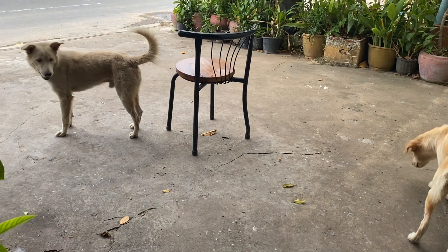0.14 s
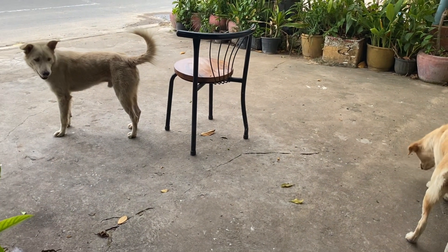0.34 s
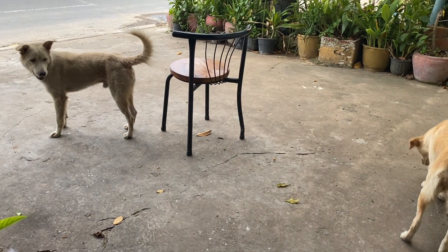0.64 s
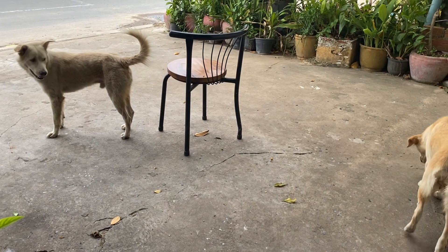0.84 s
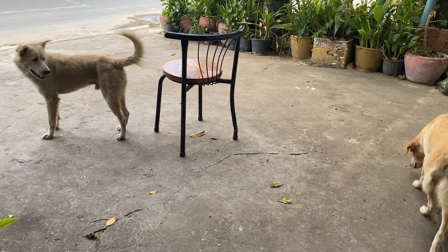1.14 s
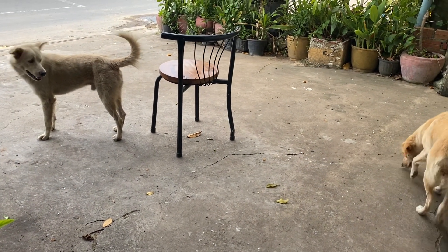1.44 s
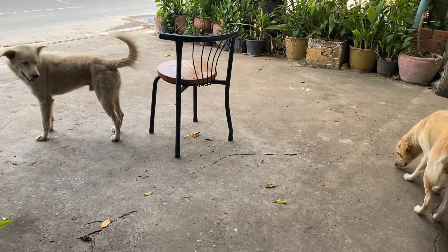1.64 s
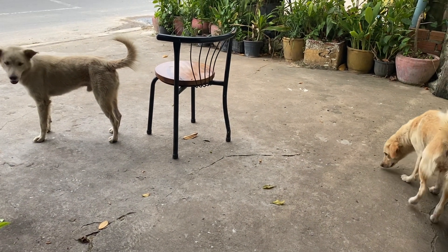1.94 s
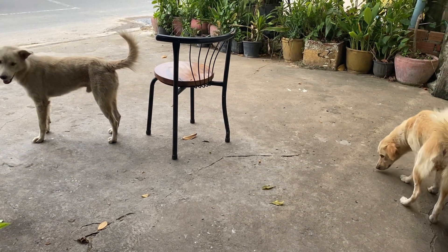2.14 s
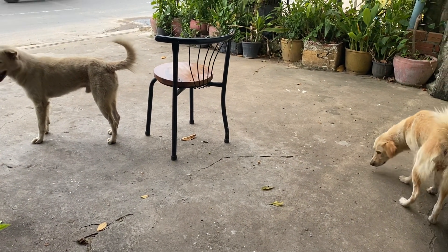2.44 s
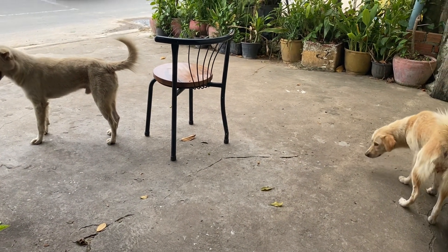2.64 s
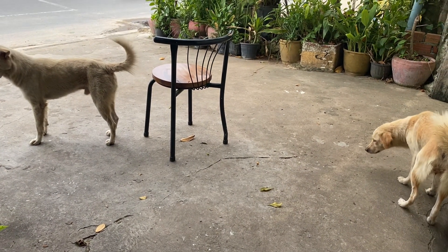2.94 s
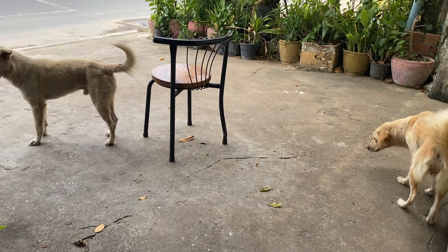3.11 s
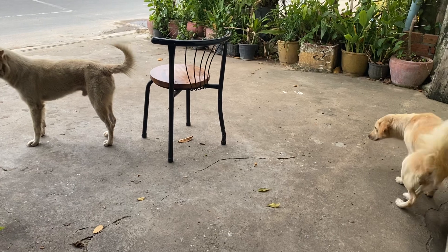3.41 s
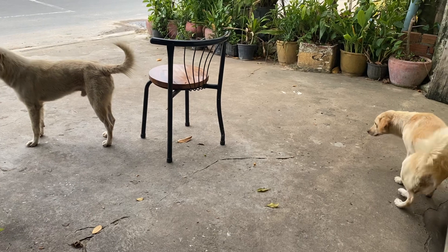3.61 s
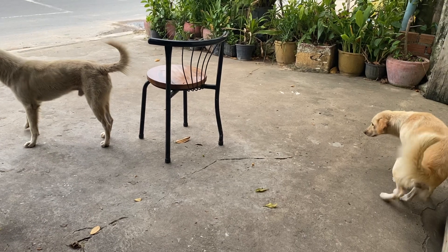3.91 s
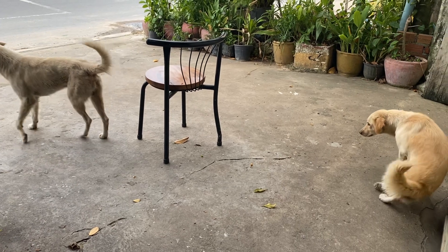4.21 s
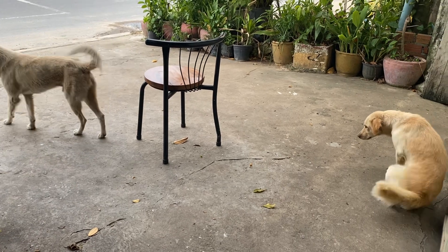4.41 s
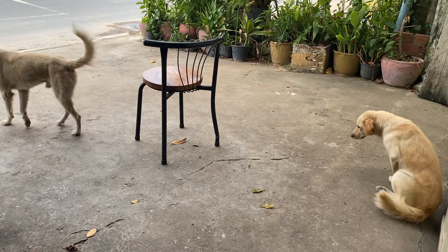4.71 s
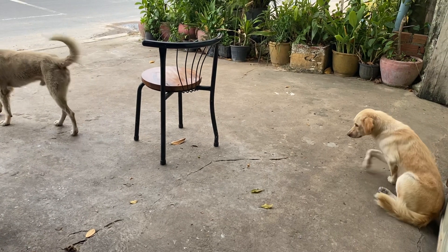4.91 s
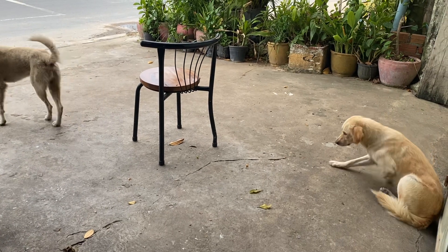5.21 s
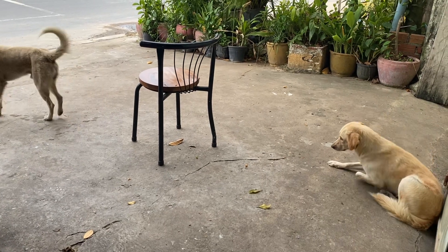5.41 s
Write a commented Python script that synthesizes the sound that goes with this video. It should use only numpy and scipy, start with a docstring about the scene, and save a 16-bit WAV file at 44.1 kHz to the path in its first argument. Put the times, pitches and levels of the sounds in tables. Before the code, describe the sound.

Low puttering motorbikes pass one after another on a road beside a concrete yard, with faint bird chips and a dog's claws scraping.

```python
"""On a road left of a concrete yard, a small motorbike throbs past over distant traffic in the first two seconds.
A dog's claw ticks and scrapes at 1.1 s, a bird chips from then on, and a second, quieter and slightly
higher-pitched bike drones by near 2.5 s. The claws scrape again at 4 s, and a third bike swells towards the end.
Trains of puffs through resonant pipes make the exhausts; coloured noise makes tyres, hiss, howls and claws.
Falling sine whistles make the bird; decaying noise tails scatter engines, bird and claws around the yard."""
import sys
import numpy as np
from scipy import signal
from scipy.fft import rfft, irfft, next_fast_len
from scipy.io import wavfile
from scipy.ndimage import uniform_filter1d, map_coordinates

SR = 44100
rng = np.random.default_rng(int(sys.argv[2]) if len(sys.argv) > 2 else 0)


def output_pcm(signal):
    """Save a mono or channel-first signal as 16-bit PCM at the path in sys.argv[1].

    Samples are clipped to [-1, 1] before scaling.
    """
    pcm = np.clip(np.atleast_2d(signal).T, -1, 1) * 32767
    wavfile.write(sys.argv[1], SR, np.round(pcm).astype(np.int16))


N = 244755


def amp(db):
    """Decibels to gain."""
    return 10 ** (np.asarray(db) / 20)


def unit(x):
    """Scale to rms 1."""
    return x / np.sqrt(np.mean(x ** 2) + 1e-20)


def along(points, hz):
    """Read (Hz, value) points along a log frequency axis."""
    point_hz, values = np.transpose(points)
    return np.interp(np.log(hz + 1), np.log(point_hz + 1), values)


def gain(points, hz):
    """Gain of a (Hz, dB) spectrum."""
    return amp(along(points, hz))


def curves(rows):
    """One value per sample for each column after the time."""
    s, *columns = np.transpose(rows)
    return [np.interp(np.arange(N) / SR, s, column) for column in columns]


def wobble(rate):
    """A smooth random curve with rate knots a second."""
    knots = rng.standard_normal(int(N * rate / SR) + 4)
    return map_coordinates(knots, [np.arange(N) * rate / SR])


def filtered(x, response):
    """Shape x by a complex response of frequency, with padding against wrap-around."""
    m = 2 * next_fast_len((N + SR) // 2)
    return irfft(rfft(x, m) * response(np.fft.rfftfreq(m, 1 / SR)), m)[..., :N]


def causal(magnitude):
    """Minimum-phase response: a resonance with this magnitude rings only after it is excited."""
    cepstrum = irfft(np.log(magnitude + 1e-6))
    half = len(cepstrum) // 2
    folded = np.r_[cepstrum[0], 2 * cepstrum[1:half], np.zeros(half)]
    return np.exp(rfft(folded))


# how alike the two microphone ports hear noise: frequency_hz, correlation [1 = identical]
PORT_LIKENESS = [(100, 0.98), (250, .9), (500, 0.95), (1100, 0.4), (2000, 0.55), (5000, 0.65), (7000, 0.35),
                 (8400, 0.91), (12000, 1)]


def noise(colour):
    """Stereo noise of rms 1, partly shared by the ports; colour gives gain at each frequency."""
    def split(hz):
        angle = np.arccos(np.clip(along(PORT_LIKENESS, hz), 0, 1)) / 2
        return colour(hz) * np.array([np.cos(angle), np.sin(angle)])

    shared, apart = filtered(rng.standard_normal((2, N)), split)
    return unit(np.array([shared + apart, shared - apart]))


def rush(spectrum):
    """Stereo noise of rms 1 with a relative (Hz, dB) spectrum."""
    return noise(lambda hz: gain(spectrum, hz))


def patchy(x, depth_db):
    """Changing paths from a moving source make narrow bands swell and fade, drawn here at random."""
    z = signal.stft(x, nperseg=2048)[2]
    field = rng.standard_normal(z.shape[1:])
    field = uniform_filter1d(field, size=3, axis=0)  # across frequency
    field = uniform_filter1d(field, size=12, axis=1)  # across time
    return unit(signal.istft(z * amp(depth_db * unit(field)), nperseg=2048)[1][:, :N])


# tone of the yard's scattered sound: frequency_hz, gain_db
YARD_TONE = [(200, -21.5), (1200, 30.5), (5000, 7.5), (10000, 16), (15000, -7)]


def yard(x, wet_db, t60):
    """The walls scatter a short tail, different at each port; wet_db is set on top of YARD_TONE."""
    t = np.arange(SR // 2) / SR
    tail = rng.standard_normal((2, len(t))) * amp(-60 * t / t60)
    tail = tail / np.linalg.norm(tail[0])
    scatter = signal.fftconvolve(np.atleast_2d(x), tail, axes=1)[:, :N]
    return x + amp(wet_db) * filtered(scatter, lambda hz: gain(YARD_TONE, hz))


def wall(x, delay, drift, echo_db):
    """A wall's echo comes later as the bike moves on, so single overtones swell and fade in turn."""
    t = np.arange(N) / SR
    echo = np.interp(t - delay - drift * t, t, x)
    return (x + amp(echo_db) * echo) / np.hypot(1, amp(echo_db))


def swell(s, half_s, fall_db, rear_db=0):
    """Level in dB around the nearest point at s: distance lowers it, rear_db tilts it to the rear."""
    past = (np.arange(N) / SR - s) / half_s
    return -fall_db * np.log10(1 + past ** 2) + rear_db * past / np.hypot(1, past)


HIDE_S = 0.042  # time constant of a bike crossing the edge of the view


def hidden(s):
    """Goes smoothly from 0 to 1 as a bike crosses the edge of the view at time s."""
    return .5 + .5 * np.tanh(.5 * (np.arange(N) / SR - s) / HIDE_S)


# throttle curves, the second closing near the end: time_s, firing_rate_hz
FIRST_THROTTLE = [(0, 27.5), (.4, 28.35), (.85, 29.55), (1.35, 29.8), (1.75, 30.25), (2.3, 30.5), (3, 30.7)]
SECOND_THROTTLE = [(0, 33), (.9, 32.2), (1.4, 33.8), (2.3, 34.3), (3.7, 33.4), (4, 32.7), (4.25, 30.5),
                   (5.55, 30)]
THIRD_THROTTLE = [(3.4, 27.4), (4.25, 28.15), (4.7, 28.7), (4.95, 29.3), (5.3, 29.3), (5.55, 29.7)]


def speeds():
    """Firings per second of the three bikes, each gliding between its throttle points."""
    return [curves(rows)[0] for rows in (FIRST_THROTTLE, SECOND_THROTTLE, THIRD_THROTTLE)]


# bikes going by, levels before the rear tilt and shading:
# nearest_s, half_width_s, out_of_sight_s, roar_db, hiss_db
BIKE_PASSES = [(1.55, 0.63, 1.87, -33.5, -40), (2.54, 0.98, 3.05, -37.5, -46.5), (5.85, 1, 7, -38, -49.5)]


def passing(peaks_db, far_db, fall_db, shade_db, rear_db):
    """Gain of one kind of road noise: every pass adds its power to the distant traffic."""
    power = amp(far_db) ** 2
    for (s, half_s, gone_s, *_), peak_db in zip(BIKE_PASSES, peaks_db):
        level_db = peak_db + swell(s, half_s, fall_db, rear_db) - shade_db * hidden(gone_s)
        power = power + amp(level_db) ** 2
    return np.sqrt(power)


# relative noise spectra of road rumble, tyres and running gear: frequency_hz, density_db (per Hz)
RUMBLE_TONE = [(20, -24), (42, -18), (58, -3), (80, -2.5), (135, -6.5), (195, -14.5), (260, -14.5),
               (370, -13), (460, -29.5), (900, -53), (3000, -86)]
TYRE_TONE = [(150, -24), (400, -1), (600, 2), (1020, 2), (1300, 1), (1550, 1), (1900, -4.5), (2200, -4.5),
             (3200, -7.5), (5000, -17), (9000, -45), (16000, -37.5)]
GEAR_TONE = [(1000, -29), (2500, -19), (4000, 4), (5200, 3), (6500, 6), (8500, 3.5), (10500, 3.5),
             (12000, -9), (13500, -48), (15500, -18)]
FAR_RUMBLE_DB, FAR_ROAR_DB, FAR_HISS_DB = -32, -67, -63  # distant traffic under the passes
PASS_RUMBLE_DB = -43


def road(flutter_db=.5, throb_db=0.8):
    """Rumble, tyre roar and running-gear hiss rise with each pass; the hiss throbs with the first engine."""
    *_, roar_db, hiss_db = np.transpose(BIKE_PASSES)
    stroke = np.cos(2 * np.pi * np.cumsum(speeds()[0]) / SR)
    tyres = patchy(rush(TYRE_TONE), depth_db=2.3)
    gear = patchy(rush(GEAR_TONE), depth_db=2.4)
    roar = passing(roar_db, FAR_ROAR_DB, fall_db=16.5, shade_db=0.5, rear_db=-1.0)
    roar = roar * amp(flutter_db * wobble(9))
    hiss = passing(hiss_db, FAR_HISS_DB, fall_db=21.5, shade_db=7.0, rear_db=1.5)
    hiss = hiss * amp(flutter_db * wobble(23.05) + throb_db * stroke)
    rumble_db = [PASS_RUMBLE_DB] * len(BIKE_PASSES)
    rumble = passing(rumble_db, FAR_RUMBLE_DB, fall_db=18, shade_db=2.5, rear_db=0)
    return roar * tyres + hiss * gear + rumble * rush(RUMBLE_TONE)


# bird chips, pitch and level of the first voice before rasp and breaks:
# start_s, start_pitch_hz, end_pitch_hz, glide_s, level_db
BIRD_CHIPS = [(1.172, 6000, 4500, .015, -43.5), (1.868, 6000, 4150, .017, -43),
              (2.615, 6000, 4300, .017, -45.5), (2.712, 6000, 4600, .017, -47),
              (3.706, 6000, 4080, .015, -44.5), (4.326, 6800, 4400, .017, -48),
              (4.348, 4900, 3350, .012, -50), (4.899, 6000, 3950, .018, -44)]
# the second voice is higher, later and weaker than the first
SECOND_VOICE_RATIO, SECOND_VOICE_LAG_S, SECOND_VOICE_DB = 1.18, .018, -8


def bird(peak=0.025):
    """Each chip is two raspy, broken whistles dropping quickly in pitch; each swells for peak seconds."""
    t, out = np.arange(SR // 5) / SR, np.zeros(N + SR)
    swell_shape = (t / peak * np.exp(1 - t / peak)) ** 2
    voices = [(1, 0, 0), (SECOND_VOICE_RATIO, SECOND_VOICE_LAG_S, SECOND_VOICE_DB)]
    for s, start_hz, end_hz, glide, level_db in BIRD_CHIPS:
        for ratio, lag, voice_db in voices:
            rasp = 1 + .04 * wobble(900)[:len(t)]
            breaks_db = 4 * wobble(220)[:len(t)] - 1.5
            drop_hz = (start_hz - end_hz) * np.exp(-(t + lag) / glide)
            pitch_hz = ratio * (end_hz + drop_hz) * rasp
            whistle = np.sin(2 * np.pi * np.cumsum(pitch_hz) / SR)
            loudness = amp(level_db + voice_db + breaks_db) * swell_shape
            out[round((s + lag) * SR):][:len(t)] += loudness * whistle
    return out[:N]


# claws on concrete: start_s, tick_level_db, scrape_level_db (before the grain), scrape_t60_s
CLAW_STEPS = [(1.091, -20, -42, .05), (3.9567, -24, -46.5, .17), (3.995, -44, -48.5, .25)]
# relative noise spectra of the tick and the dragged grit: frequency_hz, density_db (per Hz)
TICK_TONE = [(1500, -15), (4000, -11), (7500, -4), (10500, 3), (13000, 1), (16000, 3)]
GRIT_TONE = [(1500, -19), (5000, -6), (7500, 5), (10500, 3), (13000, -17), (16000, -20)]


def claws(tick_t60=0.0053):
    """A claw ticks brightly on the concrete and drags over grit: two decaying noises from one instant."""
    t, (ticks, drags) = np.arange(SR // 4) / SR, np.zeros((2, N + SR))
    for s, tick_db, scrape_db, scrape_t60 in CLAW_STEPS:
        grain_db = 3 * wobble(700)[:len(t)]
        ticks[round(s * SR):][:len(t)] += amp(tick_db - 60 * t / tick_t60)
        drags[round(s * SR):][:len(t)] += amp(scrape_db - 60 * t / scrape_t60 + grain_db)
    return ticks[:N] * rush(TICK_TONE) + drags[:N] * rush(GRIT_TONE)


# ringing, howling and hissing bands: peak_s, half_length_s, centre_hz, width_hz, level_db
PASSING_BANDS = [(1.35, .4, 2420, 260, -46), (.88, .06, 2430, 120, -46), (1.27, .06, 2450, 90, -46),
                 (1.08, .065, 2440, 120, -38.5), (1.11, .1, 810, 70, -44), (1.5, .08, 815, 35, -42),
                 (1.7, .13, 600, 200, -41), (1.75, .25, 1000, 220, -43.5), (1.66, .13, 5600, 2600, -46),
                 (2.3, .14, 830, 380, -42), (2.65, .16, 720, 420, -42), (2.72, .2, 5300, 1700, -50),
                 (2.16, .13, 3650, 500, -49), (2.12, .17, 3240, 90, -47), (2.8, .13, 3240, 110, -50),
                 (2.92, .2, 1620, 230, -44), (2.5, 1, 547, 11, -48.5), (5.35, .35, 1600, 800, -48.5)]


def passing_bands():
    """Ringing, howling and hissing bands: narrow or broad noise that swells and fades."""
    t, out = np.arange(N) / SR, np.zeros((2, N))
    for s, half_s, centre_hz, width_hz, level_db in PASSING_BANDS:
        band = noise(lambda hz: 1 / (1 + (2 * (hz - centre_hz) / width_hz) ** 2))
        out += amp(level_db) * np.exp(-((t - s) / half_s) ** 2) * band
    return out


# relative noise spectrum of the first engine's valves: frequency_hz, density_db (per Hz)
VALVE_TONE = [(500, -31), (1100, -4), (1550, 0.5), (1900, -9), (2800, -9), (4000, -13.5), (6000, -20.5),
              (9000, -42)]


def clatter(peak_db=-41, depth_db=2):
    """The first engine's valves rattle: noise that pulses twice a firing and is strongest near 0.93 s."""
    beat = np.cos(2 * 2 * np.pi * np.cumsum(speeds()[0]) / SR)
    level_db = peak_db + swell(s=0.93, half_s=.3, fall_db=21.5) + depth_db * beat
    return amp(level_db) * patchy(rush(VALVE_TONE), depth_db=2)


def exhaust(speed, level_db, bark_db, pipe, scatter_db, jitter, bark_hz=200, chamber_hz=125, chamber_q=1.33):
    """One puff per firing rings the pipe; bark_db lifts overtones above bark_hz, jitter is in seconds."""
    turns = np.cumsum(speed) / SR
    fired = np.interp(np.arange(.5, turns[-1]), turns, np.arange(N))
    chance = rng.standard_normal((len(fired), 2))
    at = np.clip(fired + jitter * SR * chance[:, 0], 0, N - 1).astype(int)
    puffs = np.bincount(at, amp(scatter_db * chance[:, 1]), N)

    def chamber(hz):
        # the silencer holds each puff back near its resonance and draws it out into a few swings
        return np.exp(-2j * np.arctan2(hz * chamber_hz / chamber_q, chamber_hz ** 2 - hz ** 2))

    note = unit(filtered(puffs, lambda hz: causal(gain(pipe, hz)) * chamber(hz)))
    upper = filtered(note, lambda hz: 1 - 1 / (1 + (hz / bark_hz) ** 8))
    return amp(level_db) * (note + (amp(bark_db) - 1) * upper)


# relative resonances of the third exhaust pipe: frequency_hz, gain_db
THIRD_RESONANCES = [(29, -52), (58, -7), (87, -17), (117, 7), (146, 11), (175, 1.5), (204, -16.5),
                    (233, -9.5), (265, -9.5), (292, -6), (322, -6), (350, -9), (380, -7.5), (408, -9),
                    (440, -21.5), (470, -13.5), (620, -37), (1500, -81)]


def third_bike(speed, peak_db=-26, bark_db=0.0, appear_s=4.71, shade_db=6.0):
    """Its exhaust lifts as it comes into sight and swells until the very end."""
    level_db = peak_db + swell(s=5.52, half_s=1.62, fall_db=27) - shade_db * (1 - hidden(appear_s))
    note = exhaust(speed, level_db, bark_db, THIRD_RESONANCES, scatter_db=.3, jitter=.00004)
    return wall(note, delay=0.0074, drift=0.00338, echo_db=-25.0)


# relative resonances of the second exhaust pipe: frequency_hz, gain_db
SECOND_RESONANCES = [(33, -28.5), (67, 8.5), (101, 7), (120, -11.5), (136, 2.5), (152, -11), (205, -13.5),
                     (340, -15), (390, -6), (460, -32.5), (1500, -56.5)]
LOAD_DB_PER_HZ = 1  # an engine on a closing throttle gets quieter as it slows


def second_bike(speed, peak_db=-32.0, bark_db=5.0, arrive_s=1.1, leave_s=4.15,
                rise_db_per_s=6, fade_db_per_s=20):
    """A long, quiet drone whose level follows the throttle; it nears, barks most while close, and rolls away."""
    t = np.arange(N) / SR
    approach_db = rise_db_per_s * np.maximum(arrive_s - t, 0)
    departure_db = fade_db_per_s * np.maximum(t - leave_s, 0)
    load_db = LOAD_DB_PER_HZ * (speed - speed.max())
    level_db = peak_db + load_db - approach_db - departure_db
    upper_db = bark_db + swell(s=2.43, half_s=0.22, fall_db=7.5)
    return exhaust(speed, level_db, upper_db, SECOND_RESONANCES, scatter_db=.35, jitter=.00008)


# relative resonances of the first exhaust pipe: frequency_hz, gain_db
FIRST_RESONANCES = [(30, -32.5), (60, 5), (90, -16.5), (120, 1.5), (150, 4.5), (180, 3), (210, -10.5),
                    (240, -2.5), (270, -9), (298, -8), (330, -15), (360, -16.5), (410, -21.5), (470, -34),
                    (820, -38), (1500, -71.5)]


def first_bike(speed, peak_db=-22.0, bark_db=0, shade_db=10, boom_gone_s=1.98, boom_db=-8):
    """Close and loud; its bark dulls as it slips out of sight, and its deep boom drops just after."""
    level_db = peak_db + swell(s=1.126, half_s=0.67, fall_db=19.0, rear_db=4.5)
    upper_db = bark_db - shade_db * hidden(BIKE_PASSES[0][2])
    note = exhaust(speed, level_db, upper_db, FIRST_RESONANCES, scatter_db=.45, jitter=.00004, bark_hz=220)
    boom = filtered(note, lambda hz: 1 / (1 + (hz / 80) ** 12))
    note = note + (amp(boom_db * hidden(boom_gone_s)) - 1) * boom
    return wall(note, delay=0.0105, drift=0.00233, echo_db=-14.0)


# exhaust overtones that briefly swell: peak_s, half_length_s, centre_hz, boost_db
OVERTONE_SWELLS = [(.3, .35, 86, 8), (.33, .2, 284, 12), (.7, .15, 275, 6), (.9, .13, 237, 7),
                   (.95, .17, 355, 13), (1.06, .13, 208, 6), (1.2, .14, 269, 8), (1.32, .13, 298, 3),
                   (1.68, .16, 332, 8), (1.68, .1, 241, 4), (1.8, .12, 303, 8), (2.6, .3, 244, 7),
                   (2.63, .12, 374, 5), (4.25, .18, 422, 16), (4.68, .15, 402, 15), (4.94, .12, 322, 9),
                   (5.17, .1, 495, 10), (5.42, .13, 354, 8), (5.38, .15, 294, 8)]
SWELL_WIDTH_HZ = 34


def overtone_swells(x):
    """Narrow bands around single exhaust overtones swell and sink back."""
    t, out = np.arange(N) / SR, x
    for s, half_s, centre_hz, boost_db in OVERTONE_SWELLS:
        overtone = filtered(x, lambda hz: 1 / (1 + (2 * (hz - centre_hz) / SWELL_WIDTH_HZ) ** 6))
        out = out + (amp(boost_db) - 1) * np.exp(-((t - s) / half_s) ** 2) * overtone
    return out


def engines():
    """The three exhausts overlap in the yard, and their nearby firing rates beat."""
    first, second, third = speeds()
    exhausts = first_bike(first) + second_bike(second) + third_bike(third)
    return yard(overtone_swells(exhausts), wet_db=-13, t60=.2)


def scene():
    """Road traffic, a bird's chips and a dog's claws, the last two with yard tails of their own."""
    traffic = road() + passing_bands() + clatter() + engines()
    chips = yard(bird(), wet_db=-6, t60=.28)
    steps = yard(claws(), wet_db=-11, t60=.1)
    return traffic + chips + steps


# phase between the two microphone ports: frequency_hz, left_lead_rad
PORT_LEAD = [(0, 0), (300, .45), (600, 1.1), (1000, 1.5), (1230, 3.1), (1600, 4.7), (2250, 6.3),
             (3000, 7.4), (4000, 6.8), (6600, 6.3), (8400, 3.14), (10000, 0), (11900, -3.14), (15500, -9.4)]
# level between the two microphone ports: frequency_hz, left_minus_right_db
PORT_LEVEL = [(60, -1.5), (110, 1), (200, -0.5), (380, -2), (700, 2.5), (1290, 0), (2380, 0.5), (4400, 2),
              (8120, 0), (15000, 0)]
TOP_HZ = 15800


def record(dry):
    """Two microphone ports differ in phase and level, and nothing passes from TOP_HZ up."""
    half = np.array([[.5], [-.5]])  # each port takes half of the difference

    def port(hz):
        lead = np.interp(hz, *np.transpose(PORT_LEAD))
        return np.exp(1j * half * lead) * amp(half * along(PORT_LEVEL, hz))

    ports = filtered(dry, port)
    return filtered(ports, lambda hz: hz < TOP_HZ)


dry = scene()
out = record(dry)
output_pcm(out)
```